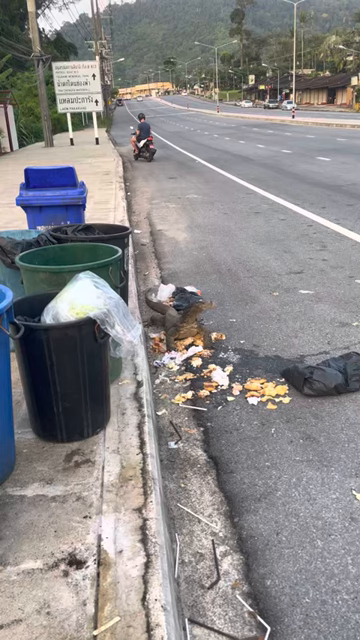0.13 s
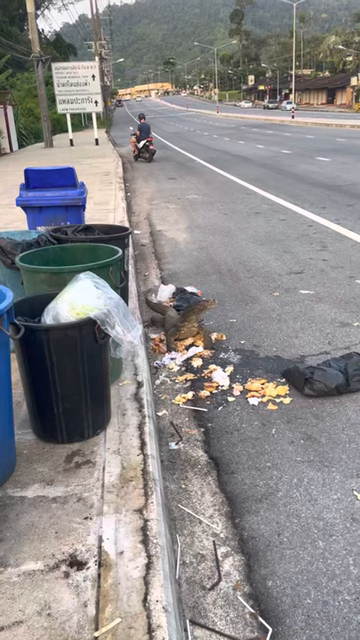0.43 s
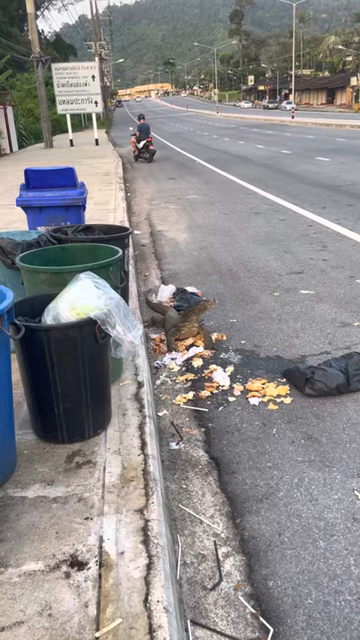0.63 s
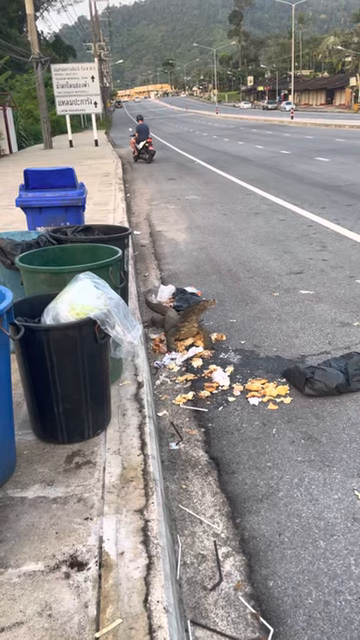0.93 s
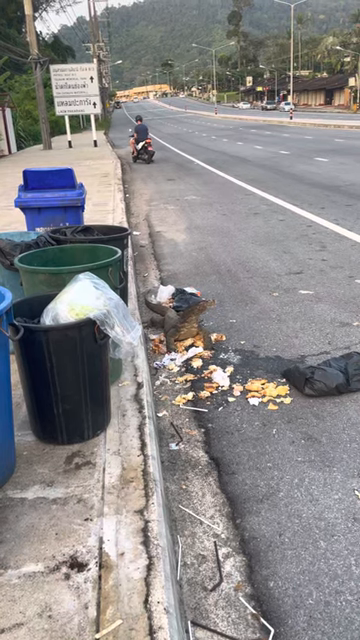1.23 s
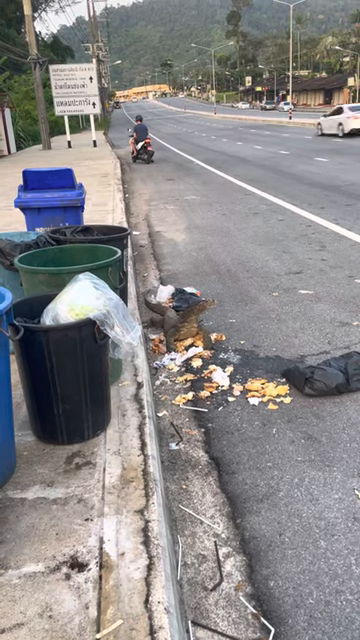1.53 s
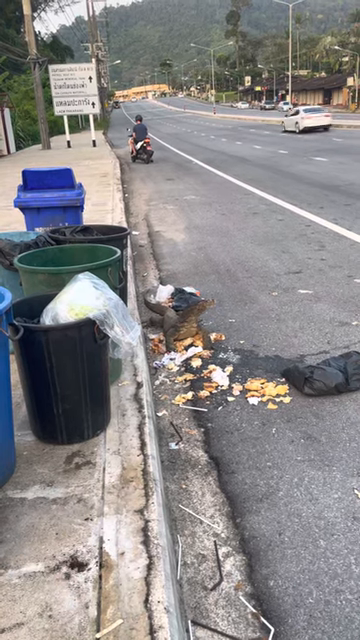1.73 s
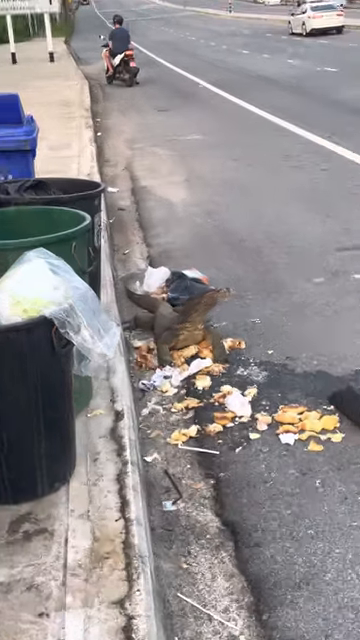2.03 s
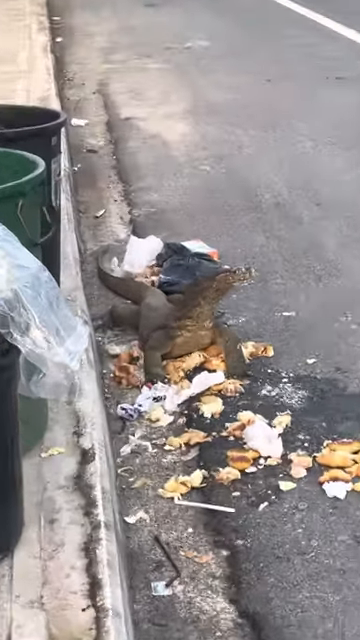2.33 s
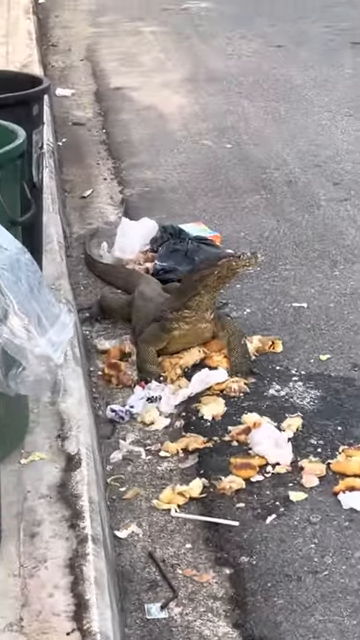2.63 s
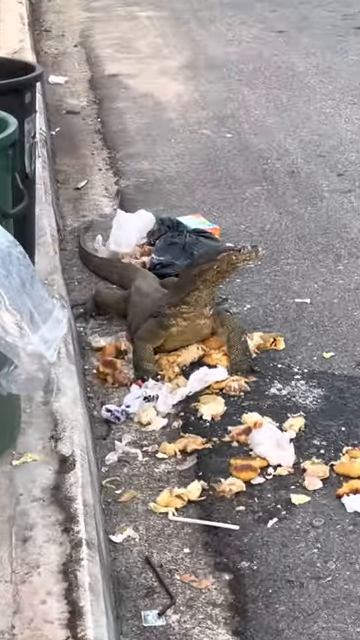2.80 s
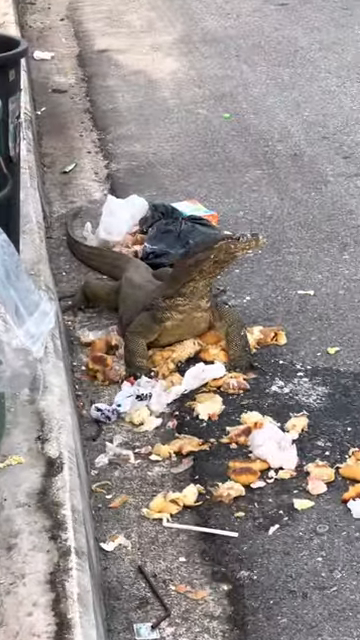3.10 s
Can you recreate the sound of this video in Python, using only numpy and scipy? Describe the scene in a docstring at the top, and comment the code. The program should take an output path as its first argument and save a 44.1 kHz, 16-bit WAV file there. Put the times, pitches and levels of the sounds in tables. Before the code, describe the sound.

Close car pass-by on an open roadside, heard in stereo from the kerb: low drone and broad tyre roar cross leftward and fade, distant traffic swells, one faint bird chirp, next vehicle building on the right.

```python
"""A car passes from right to left, heard from the kerb of a wide road. Its exhaust is three sine waves that
drop in pitch; its tyres are filtered noise that roars and hisses. More noise makes the traffic rushing further
up the road, and noise with an engine hum makes the next vehicle closing in from the right. A small bird
chirps once: a short falling sine. Left and right differ mostly in the midrange, and part of the upper
range becomes narrower in stereo late on."""
import sys
import numpy as np
from scipy import signal
from scipy.io import wavfile

SR = 44100
rng = np.random.default_rng(int(sys.argv[2]) if len(sys.argv) > 2 else 0)


def wav_record(signal):
    """Record a signal, one row per channel, as 16-bit PCM in the file named by sys.argv[1]."""
    frames = np.transpose(np.atleast_2d(signal))
    bounded = np.clip(frames, -1, 1)
    # unit amplitude maps onto the largest positive 16-bit level
    quanta = np.round(bounded * 32767).astype(np.int16)
    wavfile.write(sys.argv[1], SR, quanta)


N = 143766
T = np.arange(N) / SR

# Noise is shaped in short overlapping frames, each split into frequencies
FRAME = 1024
HZ = np.maximum(np.fft.rfftfreq(FRAME, 1 / SR), 1)[:, None]
FRAME_AT = np.minimum(np.arange(0, N + FRAME // 4, FRAME // 4), N - 1)  # sample at each frame's centre

PASS_S, TURN_S = 0.67, 0.12  # the car is level with the listener; time scale of its change from coming to going

# Exhaust pulses per second, falling as the car goes by: [start_s, pitch_hz]
FIRING_RATE = [(0, 78.6), (.42, 77.1), (.5, 74.9), (.6, 70.76), (.7, 64.76), (.8, 60.57), (.92, 58.06),
               (1.1, 58.28), (1.3, 56.67), (2.1, 55.8), (2.35, 54.3), (2.6, 51)]
# Loudness of the first three multiples of that rate: [start_s, first_db, second_db, third_db]
EXHAUST_LEVELS = [(0, -22, -47, -64), (.2, -20.5, -37.5, -56), (.33, -19, -43.5, -45),
                  (.39, -15.5, -49, -39.5), (.5, -17.5, -47, -42), (.57, -14.5, -49, -33.5),
                  (.75, -15, -42, -36.5), (.83, -15.5, -28, -45), (.89, -22, -27.5, -52),
                  (1.02, -18, -26, -51), (1.25, -25, -27, -42), (1.7, -26.5, -33.5, -42.5),
                  (2, -39, -34.5, -45.5), (2.35, -35.5, -37, -56), (2.7, -50, -42.5, -66)]
RATE_WOBBLE = .003  # share of the firing rate
FLUTTER_DB, JITTER_RAD = .3, .06  # unsteadiness of the first multiple; grows with the multiple squared


def exhaust():
    """Regular exhaust pulses drone at multiples of the firing rate; higher multiples are less steady."""
    rate, = in_time(FIRING_RATE)
    phase = 2 * np.pi * np.cumsum(rate * (1 + RATE_WOBBLE * drift(17))) / SR
    out = 0
    for k, level_db in enumerate(in_time(EXHAUST_LEVELS), 1):
        level = np.sqrt(2) * from_db(level_db + k * k * FLUTTER_DB * drift(12))
        jitter = k * k * JITTER_RAD * drift(11)
        tone = level * np.sin(k * phase + jitter + rng.uniform(0, 2 * np.pi))
        sides = from_db(k * np.array([[-.25], [.25]]))  # slightly louder on the right
        out = out + tone * sides
    return out


# Loudness of the tyre roar: [start_s, level_db]
ROAR_LEVEL = [(0, -28.5), (.2, -25.5), (.42, -23), (.65, -25), (.9, -24.5), (1.2, -27.5), (1.6, -29.5),
              (2, -32), (2.5, -34), (3.26, -45.5)]
# Balance of frequencies in the roar as the car comes: [pitch_hz, relative_level_db_per_hz]
COMING_COLOUR = [(30, -23.5), (60, 7), (130, 3), (190, -6), (290, 1), (420, -5), (700, 3.5), (950, 2.5),
                 (1400, -6), (2000, -17), (2500, -13.5), (3200, -21), (5000, -28.5), (7500, -38),
                 (10500, -38), (14000, -54.5)]
# The same as the car goes: [pitch_hz, relative_level_db_per_hz]
GOING_COLOUR = [(30, -20.5), (60, 11.5), (130, 2), (230, 4.5), (380, -2), (650, 4), (920, 4.5), (1300, 0.5),
                (1900, -8), (2800, -13.5), (3600, -24.5), (4900, -26), (5700, -29), (8000, -30),
                (10500, -31.5), (14000, -55.5)]
# Loudness of the fine hiss of the treads, strongest close by: [start_s, level_db]
HISS_LEVEL = [(.35, -73.5), (.68, -59), (1, -63), (1.4, -70.5), (2.2, -78.5), (2.8, -76), (3.26, -70)]
# Balance of frequencies in that hiss: [pitch_hz, relative_level_db_per_hz]
HISS_COLOUR = [(10500, -42.5), (12500, 2), (14000, -1), (15500, -3.5), (17000, -15)]
CROSS_S, CROSS_WIDTH_S = 0.58, 0.27  # the roar crosses the middle; time scale of the crossing


def tyres():
    """Treads on the road make broad noise: a roar that crosses and changes colour, and a fine hiss."""
    gone = swing(PASS_S, TURN_S)[FRAME_AT]
    coming_power = (1 - gone) * shape(COMING_COLOUR) ** 2
    going_power = gone * shape(GOING_COLOUR) ** 2
    side = swing(CROSS_S, CROSS_WIDTH_S)[FRAME_AT]
    roar = rush(np.sqrt(coming_power + going_power), side)
    hiss = rush(shape(HISS_COLOUR), side=.5)
    return from_db(in_time(ROAR_LEVEL)[0]) * roar + from_db(in_time(HISS_LEVEL)[0]) * hiss


NEXT_FADE_S = .2  # time scale over which the next engine fades in and the singing treads fade out

# Loudness of the traffic up the road: [start_s, level_db]
FAR_LEVEL = [(.55, -39.5), (1, -32), (1.9, -32.5), (2.25, -31), (2.75, -32), (3.26, -30.5)]
# Its balance of frequencies: [pitch_hz, relative_level_db_per_hz]
FAR_COLOUR = [(30, -22), (70, 17.5), (110, 10), (225, 2), (320, -4.5), (500, -8.5), (720, 1.5), (920, 5.5),
              (1250, 1.5), (1700, -2), (2400, -14.5), (3500, -25), (5000, -29.5), (6000, -35), (8000, -37),
              (10500, -39.5), (14000, -54.5)]
# Singing treads: a narrow band of noise, its level given against the rush
SING_HZ, SING_WIDTH_HZ, SING_WANDER_HZ = 906, 100, 45
SING_DB, SING_SURGE_DB, SING_PER_S, SING_END_S = -5.5, 2, 6, 2.69


def far_traffic():
    """Traffic up the road, to the left, is a swelling rush with a wandering, surging band of tread noise."""
    centre = SING_HZ + SING_WANDER_HZ * drift(SING_PER_S)[FRAME_AT]
    ridge = 1 / (1 + (2 * (HZ - centre) / SING_WIDTH_HZ) ** 2)
    ridge = ridge / np.sqrt(np.mean(ridge ** 2))
    sing_level = from_db(SING_DB + SING_SURGE_DB * drift(SING_PER_S))
    heard = swing(PASS_S, TURN_S) * (1 - swing(SING_END_S, NEXT_FADE_S))
    sing = heard * rush(ridge, side=1) * sing_level
    return from_db(in_time(FAR_LEVEL)[0]) * (rush(shape(FAR_COLOUR), side=1) + sing)


# Balance of frequencies in the next vehicle's noise: [pitch_hz, relative_level_db_per_hz]
NEXT_COLOUR = [(50, -10), (100, 4), (220, 6.5), (320, -5), (600, -3.5), (820, 3.5), (1400, -1), (2100, -16),
               (3100, -20), (3900, -33.5), (8000, -35.5), (14000, -58)]
NEXT_END_DB, NEXT_RISE_DB_PER_S = -31, 13  # noise level at the end, and its growth
HUM_HZ, HUM_DB, HUM_START_S = 76.2, -34, 2.62  # the hum is half faded in at its start time


def next_vehicle():
    """A wavering sine is the engine hum; noise growing on the right is the rumble and tyre roar."""
    phase = 2 * np.pi * np.cumsum(HUM_HZ * (1 + 0.011 * drift(10))) / SR
    hum = np.sqrt(2) * from_db(HUM_DB + 2.8 * drift(12)) * np.sin(phase)
    level = from_db(NEXT_END_DB + NEXT_RISE_DB_PER_S * (T - T[-1]))
    roar = level * rush(shape(NEXT_COLOUR), side=.2)
    return hum * swing(HUM_START_S, NEXT_FADE_S) + roar


# The bird's chirp: [start_s, length_s, from_pitch_hz, to_pitch_hz, peak_level_db]
BIRD_CHIRPS = [(2.77, 0.045, 7100, 5450, -58)]


def bird():
    """A thin whistle: one sine wave that falls in pitch while it swells and fades."""
    out = np.zeros(N)
    for start_s, length_s, from_hz, to_hz, level_db in BIRD_CHIRPS:
        progress = np.clip((T - start_s) / length_s, 0, 1)
        pitch_hz = from_hz + (to_hz - from_hz) * progress
        swell = np.sin(np.pi * progress) ** 2
        out += from_db(level_db) * swell * np.sin(2 * np.pi * np.cumsum(pitch_hz) / SR)
    return out


# Left loudness minus right for a sound on the right, before the ripple: [pitch_hz, difference_db]
COMING_PAN = [(100, -0.5), (250, -4), (500, -9), (900, -11.5), (1300, -5.5), (2100, -2.5), (3500, -6),
              (6000, -1), (8500, 0)]
# The same for a sound on the left: [pitch_hz, difference_db]
GOING_PAN = [(100, 2.5), (250, -2.5), (450, 3.5), (680, 1), (870, 11.5), (1200, 11.5), (2000, 1), (2700, 0),
             (3700, -7), (5500, 0)]
# How far the left side's wave runs ahead, sound on the right: [pitch_hz, lead_rad]
COMING_LEAD = [(150, 0), (380, -.7), (520, -2.4), (1000, -3.2), (1500, -3.7), (1750, -7.3), (2600, -9),
               (3800, -12.3), (5700, -12.6)]
# The same, sound in the middle: [pitch_hz, lead_rad]
ABEAM_LEAD = [(550, 0), (820, 1.5), (1250, 1), (1900, -.2), (2500, .8), (5700, .6)]
# The same, sound on the left: [pitch_hz, lead_rad]
GOING_LEAD = [(150, 0), (450, .5), (730, 1.5), (1000, .4), (1200, -1.5), (1700, -.3), (3400, 0),
              (4500, 1.8), (5700, 6.2)]
# The same in the treble, wherever the sound is: [pitch_hz, lead_rad]
TREBLE_LEAD = [(5700, 0), (7000, 1.1), (8900, 3.14), (11700, 3.14), (12800, 5.6), (14000, 6.28)]
# How alike the two sides are before narrowing: [pitch_hz, likeness_0_to_1]
LIKENESS = [(100, .99), (220, .96), (400, .8), (680, .88), (1100, .6), (1900, .92), (3600, .55), (5800, .9),
            (7500, .72), (9000, 1), (12000, 1), (13000, .75)]
# A close reflection ripples the balance: longest delay, full size, and frequency where it is reached
ECHO_LONGEST_S, ECHO_DB, ECHO_FULL_HZ = .0021, 3, 3000
# Narrowing of the upper range: time, band, share of the width lost
NARROW_S, NARROW_LOW_HZ, NARROW_HIGH_HZ, NARROW_SHARE = 1.9, 1870, 5500, 0.71
FLICKER_DB, FLICKER_PER_S = 1.08, 17.2  # level flicker in each band, and its speed


def rush(gain, side):
    """Flickering stereo noise from a side, 0 (right) to 1 (left), placed by level, timing and likeness."""
    frames = dict(nperseg=FRAME, noverlap=FRAME * 3 // 4)
    common, apart = signal.stft(rng.standard_normal((2, N)), **frames)[2]
    ears = np.array([1, -1])[:, None, None]
    below_treble = HZ < TREBLE_LEAD[0][0]

    narrow_band = (HZ > NARROW_LOW_HZ) & (HZ < NARROW_HIGH_HZ)
    width = 1 - NARROW_SHARE * narrow_band * swing(NARROW_S, .03)[FRAME_AT]
    alike = 1 - width * (1 - at_hz(LIKENESS, HZ))

    # The ripple slides with the side because the delay changes
    delay_s = ECHO_LONGEST_S * (1 + side) / 2
    ripple = ECHO_DB * np.cos(2 * np.pi * HZ * delay_s) * below_treble * np.minimum(HZ / ECHO_FULL_HZ, 1)
    pan_db = (1 - side) * at_hz(COMING_PAN, HZ) + side * at_hz(GOING_PAN, HZ) + ripple
    balance = from_db(ears * width * pan_db / 2)
    balance = balance / np.sqrt(np.sum(balance ** 2, axis=0))

    # Blend the leads as directions on a circle, so that full turns do not matter
    bearings = [((1 - side) ** 3, COMING_LEAD), (2 * side * (1 - side), ABEAM_LEAD), (side ** 3, GOING_LEAD)]
    lead = np.angle(sum(share * np.exp(1j * at_hz(table, HZ)) for share, table in bearings))
    lead = np.where(below_treble, lead * width, at_hz(TREBLE_LEAD, HZ))

    both = (np.sqrt(1 + alike) * common + ears * np.sqrt(1 - alike) * apart) * balance
    both[0] *= np.exp(1j * lead)

    # Half-octave bands flicker separately, plus half as much flicker shared by all
    band = np.clip(2 * np.log2(HZ[:, 0] / 100), 0, 11).astype(int)
    own = np.array([drift(FLICKER_PER_S)[FRAME_AT] for _ in range(band.max() + 1)])
    flicker = own[band] + .5 * drift(FLICKER_PER_S)[FRAME_AT]
    return signal.istft(both * gain * from_db(FLICKER_DB * flicker), **frames)[1][:, :N]


def shape(colour):
    """Gain at each frequency from a colour table, scaled to a mean power of 1."""
    gain = from_db(at_hz(colour, HZ))
    return gain / np.sqrt(np.mean(gain ** 2))


def from_db(db):
    """Turns decibels into gain."""
    return 10 ** (np.asarray(db) / 20)


def in_time(rows):
    """Reads each column of a table that starts with time, at every sample."""
    start_s, *columns = np.transpose(rows)
    return [np.interp(T, start_s, column) for column in columns]


def at_hz(points, hz):
    """Reads a frequency table, with equal steps per octave."""
    pitch_hz, value = np.transpose(points)
    return np.interp(np.log(hz), np.log(pitch_hz), value)


def drift(rate):
    """Smooth random wandering of spread 1; a higher rate (per second) wanders faster."""
    # Smooth noise made at every 40th sample; the first 2000 steps let the filter settle
    keep = np.exp(-2 * np.pi * rate * 40 / SR)
    noise = rng.standard_normal(N // 40 + 2002)
    slow = signal.lfilter([1], [1, -2 * keep, keep * keep], noise)[2000:]
    return np.interp(np.arange(N) / 40, np.arange(len(slow)), slow / slow.std())


def swing(centre_s, width_s):
    """A smooth step in time from 0 to 1."""
    return .5 + .5 * np.tanh((T - centre_s) / width_s)


def scene():
    """Everything heard at the kerb, added together."""
    return exhaust() + tyres() + far_traffic() + next_vehicle() + bird()


START_S, START_FADE_S, END_FADE_S = .036, .0011, .004
LOW_CUT_HZ, HIGH_CUT_HZ = 38.7, 17000


def record(dry):
    """Filters cut the lowest bass and the top; short fades start and stop the sound."""
    low_cut = signal.butter(4, LOW_CUT_HZ, "high", fs=SR, output="sos")
    high_cut = signal.cheby2(12, 70, HIGH_CUT_HZ, fs=SR, output="sos")
    fade_in = np.clip((T - START_S) / START_FADE_S, 0, 1)
    fade_out = np.clip((T[-1] - T) / END_FADE_S, 0, 1)
    out = signal.sosfilt(low_cut, dry) * fade_in * fade_out
    return signal.sosfilt(high_cut, out)


dry = scene()
out = record(dry)
wav_record(out)
```